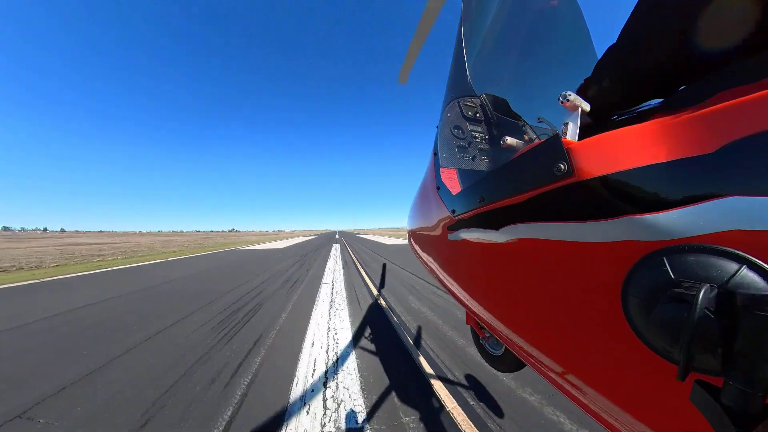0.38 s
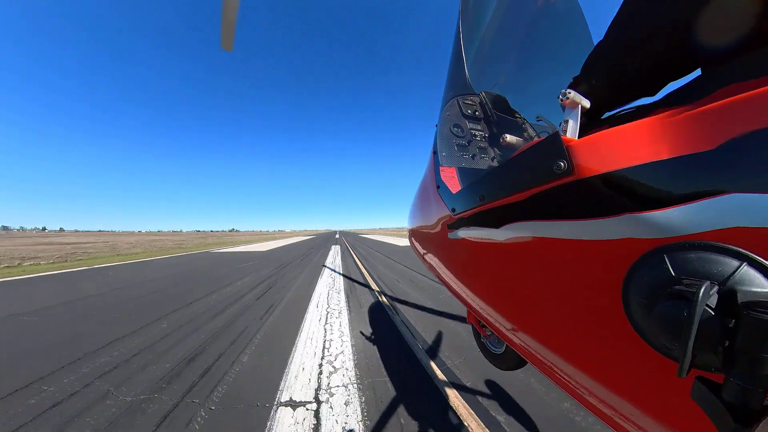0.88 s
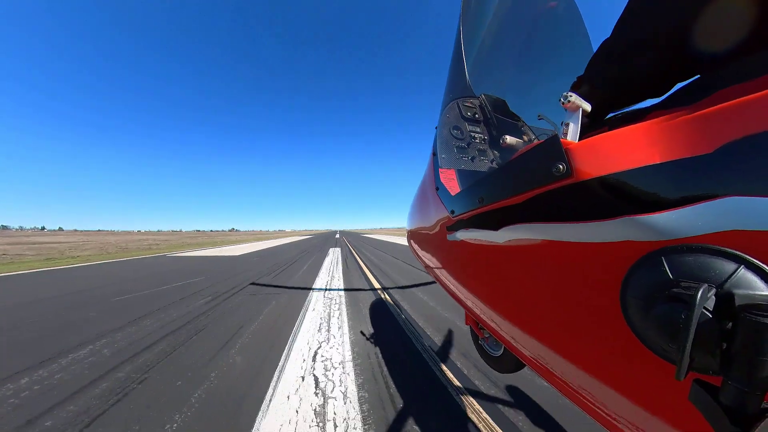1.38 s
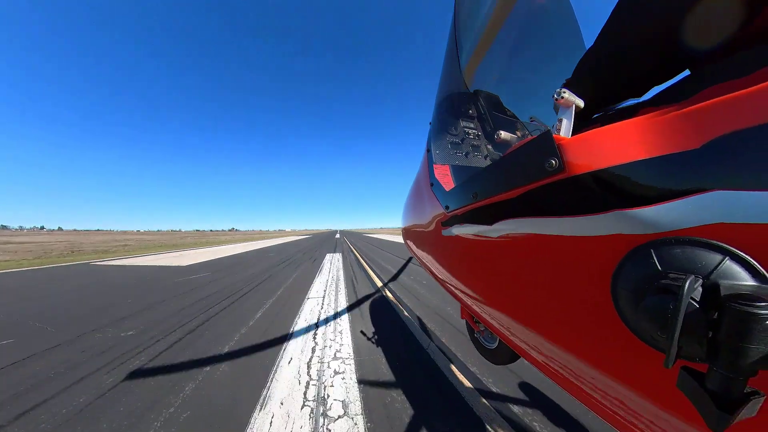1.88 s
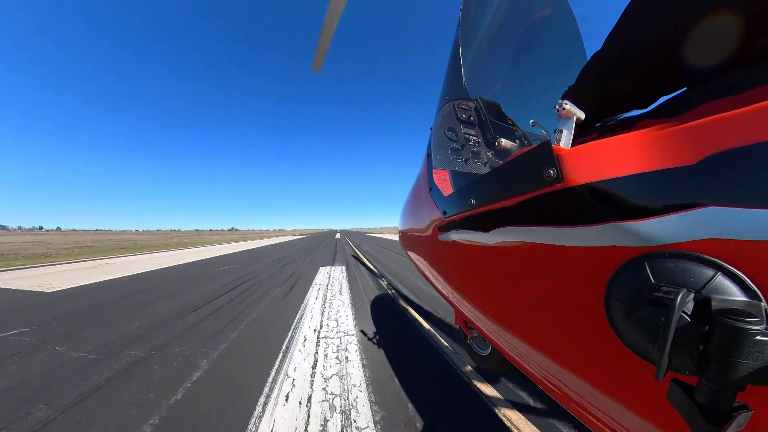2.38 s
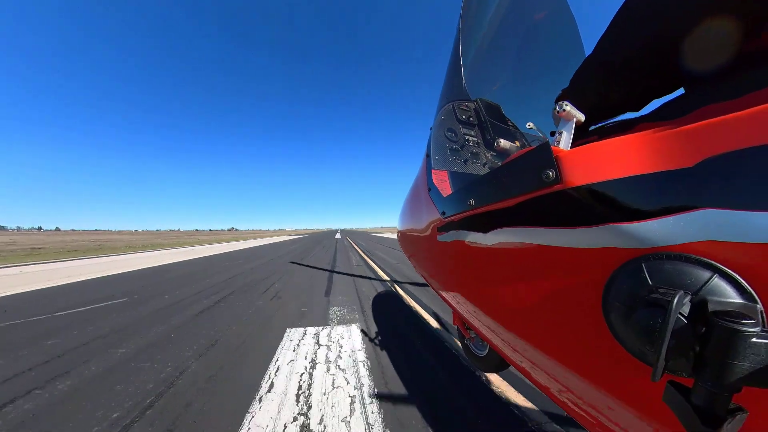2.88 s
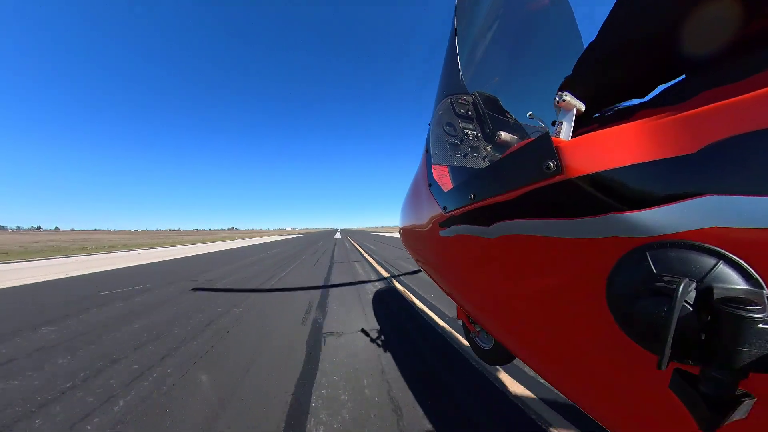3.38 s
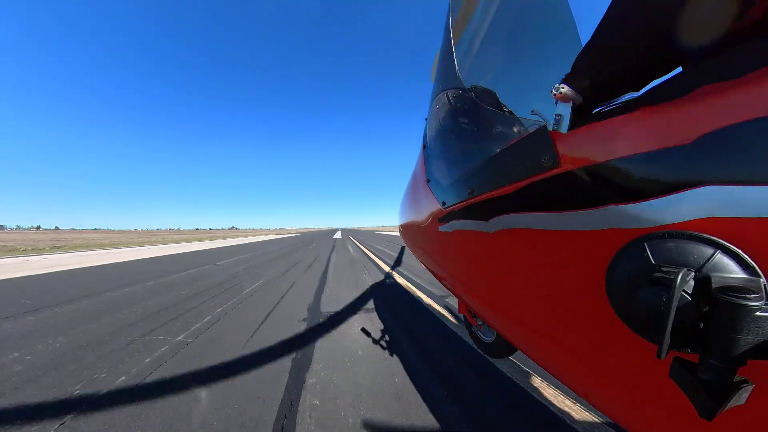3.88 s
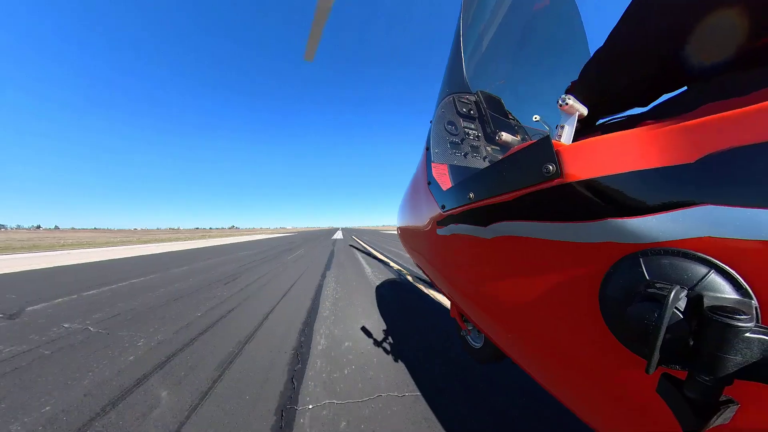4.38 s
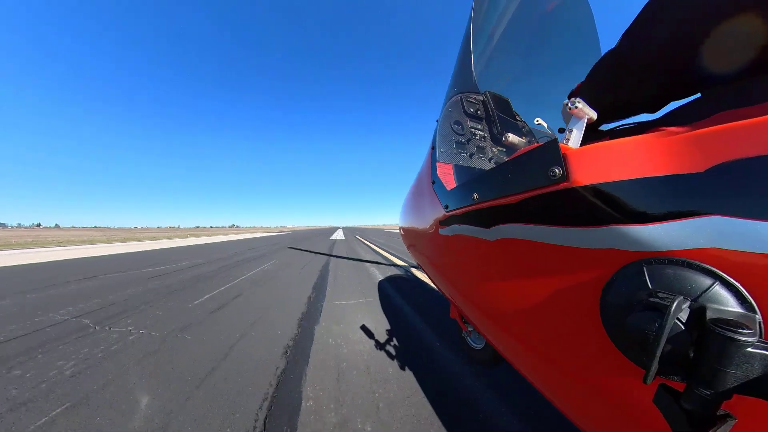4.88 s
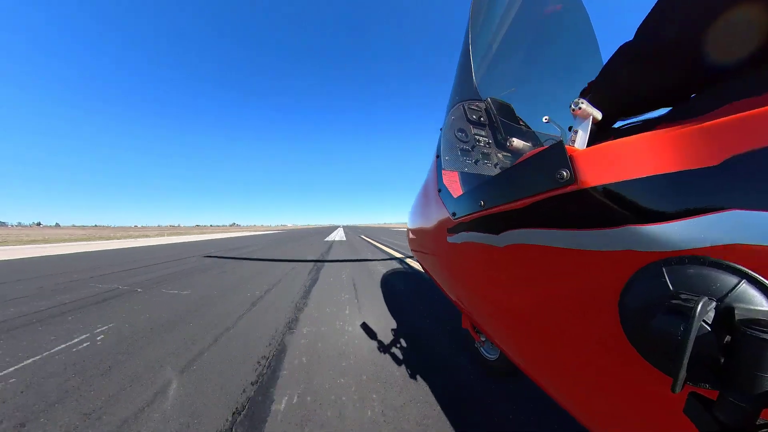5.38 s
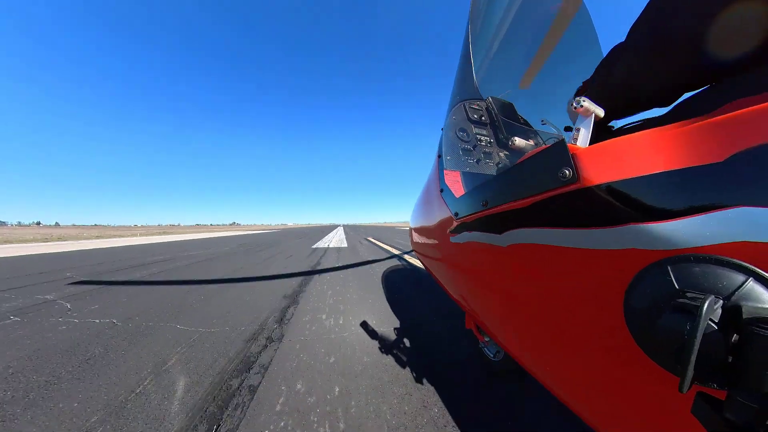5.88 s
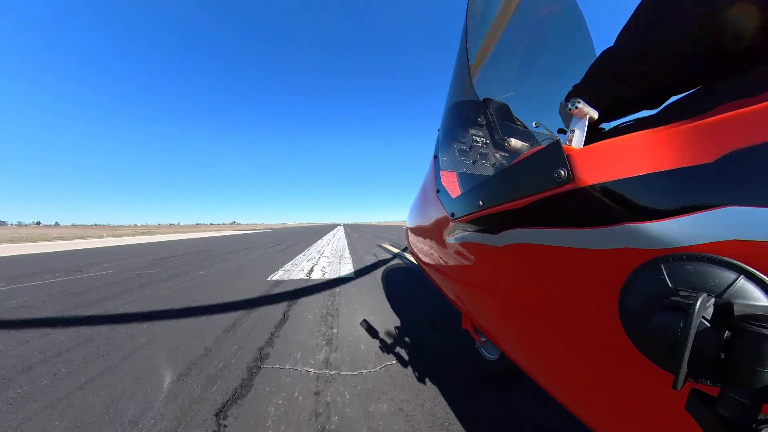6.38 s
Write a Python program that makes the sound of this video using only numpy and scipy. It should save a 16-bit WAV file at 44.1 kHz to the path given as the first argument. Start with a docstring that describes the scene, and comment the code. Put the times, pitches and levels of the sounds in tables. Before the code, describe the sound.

From the start, heavy low wind buffets a small microphone mounted on the side of a gyroplane rolling along an open runway, with a gusting roar and light fluttering hiss. Beneath it the engine hums, revving up from 0 to about 1.2 seconds, holding briefly, then easing down steadily from about 2 seconds to the end, while the propeller drone shows more overtones. Rotor blades pass about ten times a second, each a high hiss and whistle sliding down in pitch; faint at first, they are clearer from about 1.6 seconds, strong to about 5.5, then weaker. Dull hollow knocks land near 1.0, 1.6, 2.0, 2.5, 3.2, 3.7, 4.8 and 5.4 seconds, amid faint rattles. Small hard ticks appear around 2.5, 3.7 and 4.4. From 5.7 onward knocks and ticks crowd into an irregular clatter, strongest near 5.9, continuing almost to the end under slightly rough, treble-edged sound.

```python
"""A gyroplane rolls along a runway, heard by a small camera fixed to its side. From the start wind buffets the
microphone as banded, gusting noise; exhaust and pusher propeller hum through it as sine tones tied to the crank,
revving up and then easing off. Each of the two rotor blades sweeps overhead with a Doppler-bent whistle and hiss.
Loose parts knock now and then as damped tones with a crack, sharp ticks join in later, and near the end the
knocks crowd together."""
import sys
import numpy as np
from scipy import signal
from scipy.fft import rfft, irfft, next_fast_len
from scipy.io import wavfile
from scipy.ndimage import uniform_filter1d, map_coordinates

SR = 44100
rng = np.random.default_rng(int(sys.argv[2]) if len(sys.argv) > 2 else 0)


def put_to_file(sound):
    """Save the sound as 16-bit audio at rate SR, in the file named by the first command-line argument."""
    columns = np.atleast_2d(sound).T  # one column per channel
    safe = np.clip(columns, -1, 1)
    whole_steps = np.round(safe * 32767)
    wavfile.write(sys.argv[1], SR, whole_steps.astype(np.int16))


def how_loud(loudness_db):
    """Turn decibels into a plain amplitude multiplier (0 dB gives 1, 20 dB gives 10)."""
    steps = np.asarray(loudness_db, float) / 20
    return 10 ** steps


N = 286209  # samples in the scene


def unit(x):
    """Scale to rms 1."""
    return x / np.sqrt(np.mean(np.abs(x) ** 2) + 1e-20)


def curves(rows):
    """One value per sample for each column after the time."""
    seconds, *columns = np.transpose(rows)
    return [np.interp(np.arange(N) / SR, seconds, column) for column in columns]


def wobble(rate):
    """A smooth random curve, rate knots a second."""
    knots = rng.standard_normal(int(N * rate / SR) + 4)
    return map_coordinates(knots, [np.arange(N) * rate / SR])


def coloured(x, points):
    """x through the gain of (Hz, dB) points read on a log axis."""
    size = next_fast_len(N + 8192)
    hz, db = np.transpose(points)
    bins = np.fft.rfftfreq(size, 1 / SR)
    gain = how_loud(np.interp(np.log(bins + 1), np.log(hz + 1), db))
    return irfft(rfft(x, size) * gain, size)[:N]


def patchy(spectrum, patchy_db):
    """Noise of rms 1 with patches of random gain in time and pitch."""
    z = signal.stft(rng.standard_normal(N), nperseg=512)[2]
    field = uniform_filter1d(rng.standard_normal(z.shape), size=5, axis=0)  # smooth across pitch
    field = uniform_filter1d(field, size=8, axis=1)  # smooth across time
    noise = signal.istft(z * how_loud(patchy_db * unit(field)), nperseg=512)[1][:N]
    return unit(coloured(noise, spectrum))


def wind():
    """Turbulence on the microphone: low buffeting, a roar, and a rush and fizz that flutter in short gusts."""
    # Each row: time in seconds, then buffet, roar, rush and fizz level in dB, before the trims below.
    layer_levels = [(0, -16, -29, -41, -61), (.3, -24, -27.5, -43, -59), (.7, -23, -28.5, -43, -60),
                    (1.3, -26.5, -31.5, -40.5, -57.5), (2.3, -24.5, -29, -42, -56),
                    (2.9, -21.5, -29.5, -42, -56.5), (3.3, -23.5, -30.5, -45, -56.5),
                    (3.8, -21, -30, -43.5, -56.5), (4.4, -23, -31, -46.5, -55.5),
                    (5.5, -24.5, -34, -45, -57.5), (6, -21.5, -34, -44, -57.5),
                    (6.49, -24.5, -32.5, -46.5, -60.5)]
    # Tone of the four layers. Each row: frequency in Hz, noise density in dB per Hz.
    buffet_tone = [(8.2, -42), (14, -12.5), (40, 3), (81, 4.5), (260, -5), (340, -44.5), (570, -120)]
    roar_tone = [(82, -28), (140, -2), (249, -13), (286, -2), (562, -11), (1000, -26), (1300, -54.5),
                 (2200, -120)]
    rush_tone = [(350, -24.5), (600, -3.5), (1050, -8.5), (1900, -29), (2470, -55.5), (4180, -120)]
    fizz_tone = [(820, -24), (1400, -3.5), (2660, -14), (3520, -24.5), (4290, -36), (4870, -37),
                 (5200, -30), (6760, -64.5), (11400, -120)]
    # The fizz opens up with speed. Each row: time in seconds, gain of its top in dB.
    top_gain = [(0, -8.5), (.35, -5.5), (1, -3.5), (2.2, -0.5), (5.68, 0.5), (5.78, 6), (5.86, 1.5),
                (5.95, 2), (6.03, -0.5), (6.49, 2)]
    # Filter for what lies under that top. Each row: frequency in Hz, gain in dB.
    dull_filter = [(2200, 0), (3200, -20)]

    buffet_db, roar_db, rush_db, fizz_db = curves(layer_levels)
    gust = .5 * wobble(9.8) + 1.4 * wobble(60)  # shared by roar, rush and fizz
    buffet = how_loud(buffet_db - 1.5 + 0.82 * wobble(7)) * patchy(buffet_tone, patchy_db=1.0)
    roar = unit(how_loud(0.3 * gust + 0.4 * wobble(5)) * patchy(roar_tone, patchy_db=.7))
    rush = unit(how_loud(1.2 * gust) * patchy(rush_tone, patchy_db=-0.36))
    fizz = unit(how_loud(0.65 * gust + .4 * wobble(4)) * patchy(fizz_tone, patchy_db=1.2))
    dull = coloured(fizz, dull_filter)
    top = how_loud(curves(top_gain)[0] + 0.79 * wobble(12)) * (fizz - dull)
    return buffet + how_loud(roar_db - 1.04) * roar + how_loud(rush_db - 0.26) * rush + how_loud(fizz_db + 1.0) * (dull + top)


def engine():
    """Exhaust orders of the crank and blade tones of the propeller, each wavering in the turbulent air."""
    # Engine speed, revving up and easing off. Each row: time in seconds, crank speed in Hz.
    crank_speed = [(0, 47), (.4, 53.6), (.8, 61.3), (1.2, 63.7), (1.6, 63.6), (2, 62.2), (2.4, 60.4),
                   (3.6, 52.7), (4.1, 50.2), (4.8, 48.1), (6.49, 45.1)]
    # Exhaust tones. Each row: order in cycles per crank turn, level in dB over the exhaust level.
    exhaust_orders = [(1, 3), (2, 6), (3, -2), (4, .5), (4.5, -7), (5, -6), (6, -6), (7, -9), (9, -11),
                      (11, -19), (15, -25), (17, -20)]
    # Propeller, its overtones coming out once the throttle is closed.
    # Each row: time in seconds, then level in dB of the blade tone, its 2nd and its 3rd harmonic.
    blade_levels = [(0, -34, -48, -49), (1.2, -28, -45, -52), (2.4, -32, -39, -51), (2.8, -34, -42, -46),
                    (3.2, -31, -43, -39), (3.55, -29, -44, -31), (3.85, -30, -39, -34), (4, -29, -37, -41),
                    (4.2, -28, -34, -41), (4.6, -27, -33, -41), (4.9, -28, -29, -36), (5.5, -27, -29, -32),
                    (6.49, -30, -30, -33)]
    blades_per_turn = 4 / 2.43  # four propeller blades behind the reduction gear
    full_db, full_hz = -35, 63  # exhaust level at full crank speed
    slope_db_per_hz, idle_db = .95, -44  # its fall below that speed, and its floor

    (crank_hz,) = curves(crank_speed)
    exhaust_db = np.maximum(full_db + slope_db_per_hz * (crank_hz - full_hz), idle_db)
    crank_angle = 2 * np.pi * np.cumsum(crank_hz) / SR

    def tone(order, db):
        """A sine locked to the crank, unsteady in level and phase as turbulent air makes it."""
        level_db = db + 1.4 * wobble(5) + .5 * min(order, 3) * wobble(14)
        phase = order * (crank_angle + .06 * wobble(12)) + 2 * np.pi * rng.random()
        return np.sqrt(2) * how_loud(level_db) * np.sin(phase)

    exhaust = sum(tone(order, exhaust_db + db) for order, db in exhaust_orders)
    propeller = sum(tone((k + 1) * blades_per_turn, db) for k, db in enumerate(curves(blade_levels)))
    return exhaust + propeller


def rotor():
    """Each blade throws a sharp-edged puff and a weaker trailing wash; its tones arch up and slide down as it leaves."""
    # Each row: time in seconds, blade passes a second.
    pass_rate = [(0, 10.53), (3.6, 10.54), (5.05, 10.29), (5.45, 10.05), (5.85, 10.2), (6.2, 10.55),
                 (6.49, 10.55)]
    # Each row: time in seconds, swish level in dB.
    swish_level = [(0, -58.5), (.5, -51), (1.2, -50.5), (1.62, -44), (1.75, -46.5), (2.2, -45), (2.8, -43),
                   (3.15, -43), (3.27, -46.5), (3.36, -41.5), (3.72, -43), (3.88, -47), (4.1, -43.5),
                   (4.27, -40.5), (4.4, -44.5), (4.5, -43), (5.25, -42.5), (5.62, -48.5), (5.82, -46.5),
                   (5.96, -50), (6.13, -49.5), (6.49, -52)]
    # Shape of a pass. Each row: time in seconds, puff end and highest pitch in passes from overhead,
    # trailing wash over the lull in dB, approach whistle in dB, Doppler swing in Hz (half the full fall).
    pass_shape = [(0, .22, .06, 2, 3, 470), (2, .2, .06, 2, 3, 470), (3.5, .15, .04, 3.5, 1, 480),
                  (4.6, .04, -.04, 4.5, -4, 540), (5.2, .02, -.08, 4.5, -4, 560),
                  (5.7, .13, -.28, 6, -6, 580), (6.49, .13, -.3, 6, -6, 580)]
    # Tone of hiss and whistles. Each row: frequency in Hz, density or gain in dB.
    swish_tone = [(4300, -43.5), (5300, -38), (5900, -11), (6500, -0.5), (7100, 1.5), (7600, -3),
                  (8000, -2.5), (8100, -64.5)]
    # Trailing-edge tones. Each row: highest pitch in Hz before its wander, blur rate in Hz, relative level in dB.
    whistles = [(7150, 170, 0), (7390, 170, -8), (6230, 170, -6)]
    first_pass, puff_opens, wash_ends, edge = -.31, -0.28, 0.44, .03  # in passes from overhead
    approach_bend = .55  # the pitch climbs less on the way in than it falls on the way out

    (rate,), (swish_db,) = curves(pass_rate), curves(swish_level)
    puff_ends, crest, wash_db, approach_db, swing_hz = curves(pass_shape)
    passes = first_pass + np.cumsum(rate) / SR
    place = (passes + .5) % 1 - .5  # 0 is overhead

    def step(at):
        """A soft switch from 0 to 1 as the blade crosses a place."""
        return (1 + np.tanh((place - at) / edge / 2)) / 2

    puff = step(puff_opens) - step(puff_ends)
    wash = step(puff_ends) - step(wash_ends)
    near = np.cos(2 * np.pi * place)
    strength_db = 0.48 * wobble(17.0) + 0.4 * np.cos(np.pi * passes)  # passes differ, and so do the two blades

    hiss_db = 8.6 * puff + wash_db * wash + 2.0 * near - 4.0 + 2.1 * wobble(150)
    hiss = how_loud(hiss_db) * patchy(swish_tone, patchy_db=3.0)

    past = np.clip(place - crest, -.5, .5)
    bend = -(1 - np.cos(2 * np.pi * past)) * np.where(past < 0, approach_bend, 1)
    tones = 0
    for hz, width_hz, level_db in whistles:
        glide_hz = hz + swing_hz * bend + 75 * wobble(10.5)
        shedding = unit(wobble(width_hz) + 1j * wobble(width_hz))  # uneven vortices blur the tone
        carrier = np.exp(2j * np.pi * np.cumsum(glide_hz) / SR)
        tones = tones + how_loud(level_db) * np.real(shedding * carrier)
    tones_db = 9.5 * puff + 7 * wash + approach_db * (1 - puff - wash) + 2.5 * near - 3 + 2.1 * wobble(10)
    tones = how_loud(tones_db) * coloured(tones, swish_tone)
    return how_loud(swish_db) * unit(how_loud(strength_db) * (hiss + tones))


def knocks():
    """A dull blow: a few cycles of a damped hollow part under a dry crack; fainter ones rattle at random."""
    # Each row: start in seconds, peak level of the thud in dB, nominal pitch in Hz.
    loud_blows = [(1.045, -25.5, 605), (1.625, -30, 570), (1.961, -23, 443), (2.532, -25, 520),
                  (3.184, -21, 468), (3.694, -26, 580), (4.808, -28, 562), (5.41, -30, 462),
                  (5.74, -23, 560), (5.817, -29, 720), (5.935, -18, 619), (5.838, -27, 620),
                  (5.978, -28, 560), (5.997, -26, 700), (6.003, -23.5, 560), (6.031, -21, 520),
                  (6.099, -24.5, 600), (6.128, -25, 510), (6.191, -23, 520), (6.205, -27, 720),
                  (6.228, -21.5, 590), (6.24, -28, 720), (6.264, -31, 640), (6.295, -27, 700),
                  (6.325, -26, 520), (6.333, -29, 740), (6.389, -30, 580), (6.427, -31, 540)]
    # Faint rattle between the knocks. Each row: from and to in seconds, number of contacts, typical peak in dB.
    rattle = [(0, 5.7, 10, -36), (5.7, 6.45, 16, -33)]
    # Contact noise. Each row: frequency in Hz, density in dB per Hz.
    crack_tone = [(250, -25), (400, -2), (900, 0), (1400, -11), (2000, -21), (2800, -40), (4500, -70)]
    rattle_hz, rattle_spread = 540, .2  # middle pitch, log spread
    base_crack_db, crack_scatter_db = -37, 2  # the dry crack is much the same for every loud blow
    peak_s = .0017  # time to the peak

    out, t = np.zeros(N + SR), np.arange(SR // 25) / SR
    contact = np.pad(patchy(crack_tone, patchy_db=0.5), (0, len(t)))
    blows = [(s, db, hz, base_crack_db) for s, db, hz in loud_blows]
    for begin, end, count, db in rattle:
        chance = rng.standard_normal((count, 2))
        for s, (a, b) in zip(rng.uniform(begin, end, count), chance):
            blows.append((s, db + 2 * a, rattle_hz * np.exp(rattle_spread * b), base_crack_db - 6.0))
    shape = (t / peak_s * np.exp(1 - t / peak_s)) ** 1.2
    for s, db, hz, crack_db in blows:
        start = round(s * SR)
        thud = how_loud(db) * np.sin(2 * np.pi * hz * t * (1.06 - 9 * t))  # the pitch sags as the contact loosens
        crack = how_loud(crack_db + crack_scatter_db * rng.standard_normal()) * contact[start:][:len(t)]
        out[start:][:len(t)] += shape * (thud + crack)
    return out[:N]


def ticks():
    """Something small and hard snaps against the hull: a cycle or two of ring in a very short bright burst."""
    # Each row: start in seconds, peak of the burst envelope in dB, ring pitch in Hz.
    snaps = [(2.464, -34, 1000), (2.558, -26.5, 1300), (2.571, -40, 1600), (3.722, -35, 1250),
             (3.788, -33, 1400), (4.388, -25, 880), (4.618, -33, 950), (5.778, -43, 1700),
             (5.936, -31, 1100), (6.003, -32, 1100), (6.032, -36, 1500), (6.101, -35, 1000),
             (6.129, -32, 1150)]
    # Snap noise. Each row: frequency in Hz, density in dB per Hz.
    snap_tone = [(400, -15), (800, 0), (1300, -2), (2000, -11), (3000, -26), (4500, -52), (6000, -90)]
    peak_s, snap_db = .0013, -9  # time to the peak; noise of the snap, under its ring

    t = np.arange(N) / SR
    rings, bursts = 0, 0
    for s, db, hz in snaps:
        since = np.maximum(t - s, 0)
        shape = how_loud(db) * (since / peak_s * np.exp(1 - since / peak_s)) ** 3
        rings = rings + shape * np.sin(2 * np.pi * hz * since)
        bursts = bursts + shape
    noise_rms = np.std(coloured(rng.standard_normal(N), snap_tone))
    snap = coloured(bursts * rng.standard_normal(N), snap_tone) / noise_rms
    return coloured(rings, [(3000, 0), (4500, -40)]) + how_loud(snap_db) * snap


def scene():
    """Everything reaches one microphone."""
    return (wind() + engine() + rotor() + knocks() + ticks())[None]


def low_pass(x):
    """Removes everything above the highest recorded frequency."""
    return signal.sosfilt(signal.butter(12, 9450, fs=SR, output="sos"), x)


def record(dry):
    """The camera samples at 16 kHz, so the treble leaks back mirrored about 8 kHz; peaks are squeezed softly."""
    # Resampler leak. Each row: frequency in Hz, gain in dB.
    leak_filter = [(7950, -61.5), (8050, -1), (8600, -13), (9000, -23.5), (9500, -38.5), (9800, -64)]
    carrier = np.cos(2 * np.pi * 16000 * np.arange(N) / SR)
    mirror = coloured(2 * dry[0] * carrier, leak_filter)
    mix = dry + mirror
    mix = mix / (1 + np.abs(mix / .36) ** 4) ** (1 / 4)  # peaks bend towards a ceiling of .36
    return low_pass(mix)


dry = scene()
out = record(dry)
put_to_file(out)
```